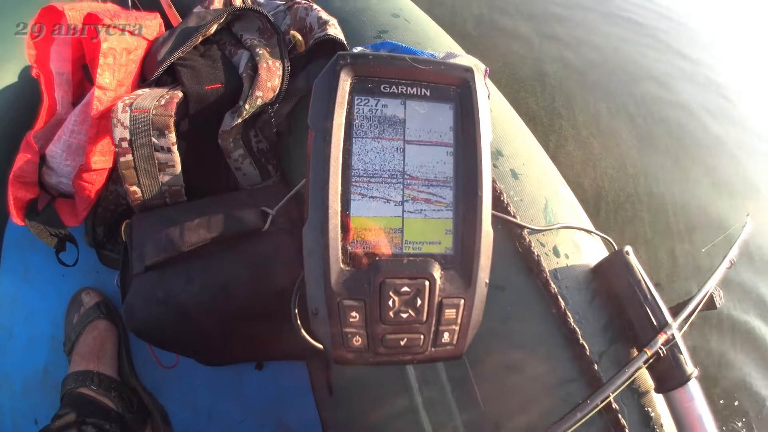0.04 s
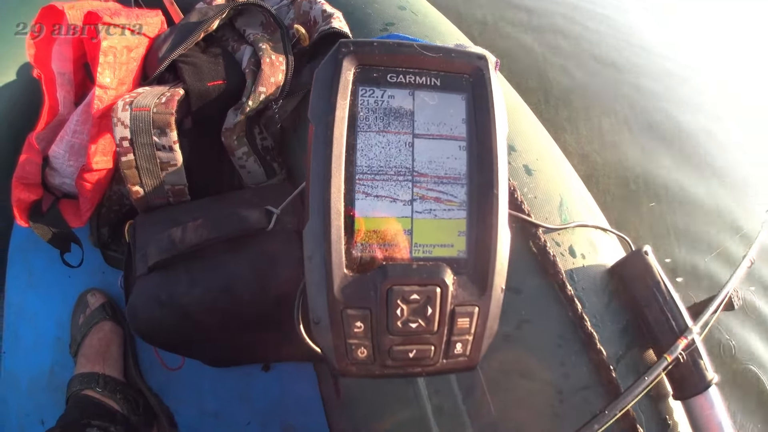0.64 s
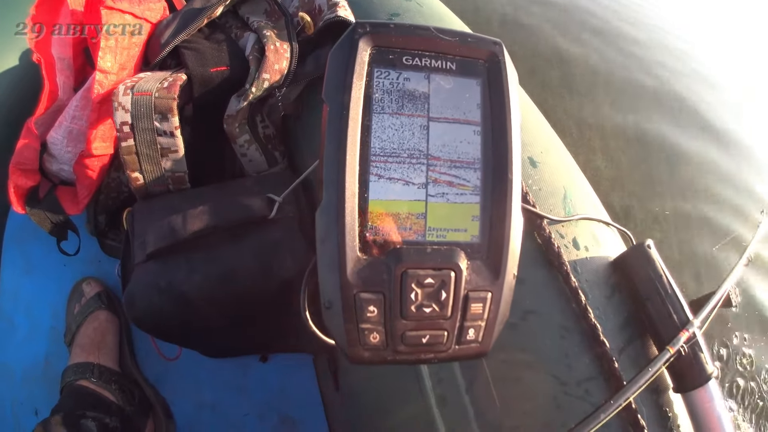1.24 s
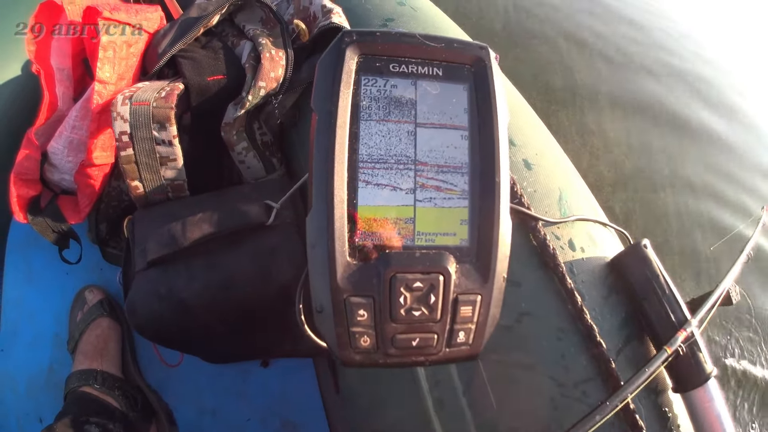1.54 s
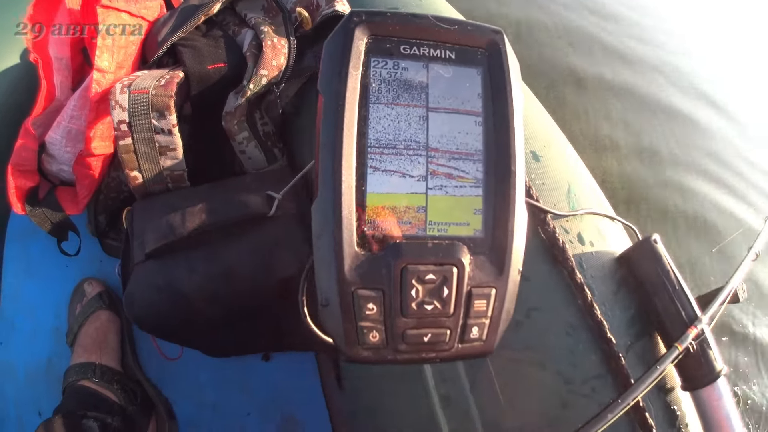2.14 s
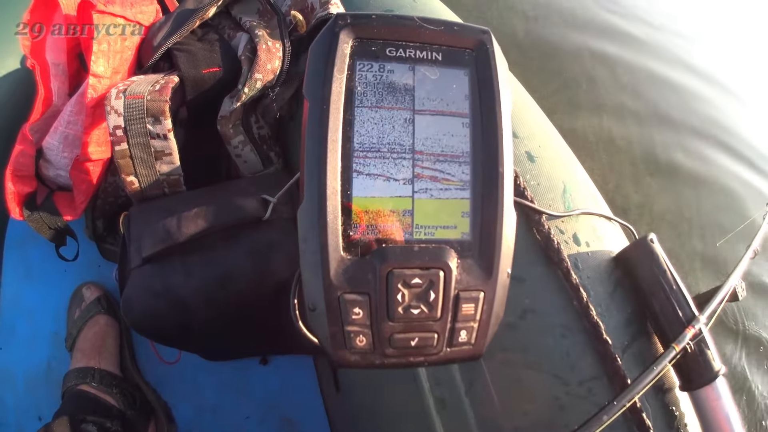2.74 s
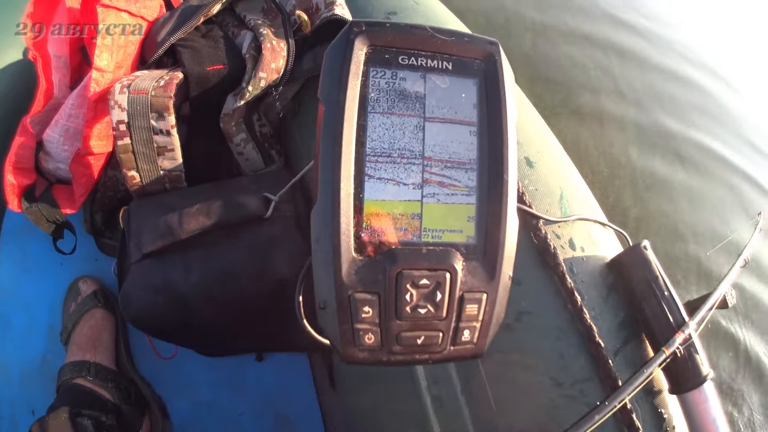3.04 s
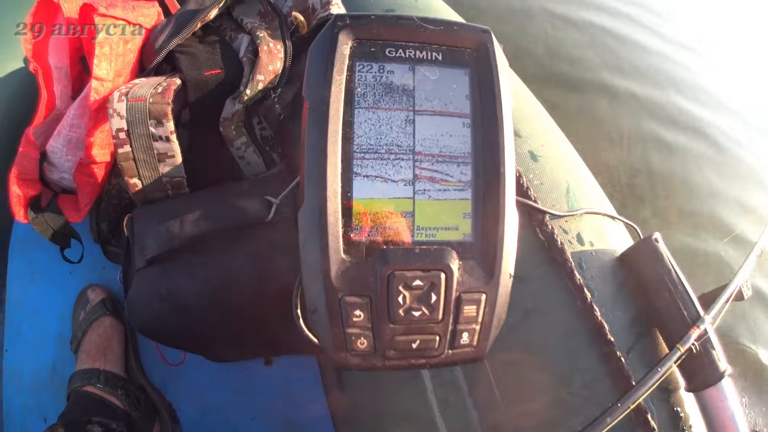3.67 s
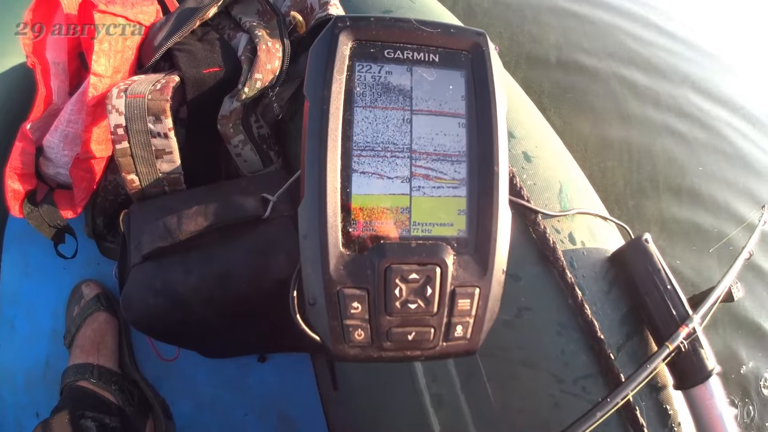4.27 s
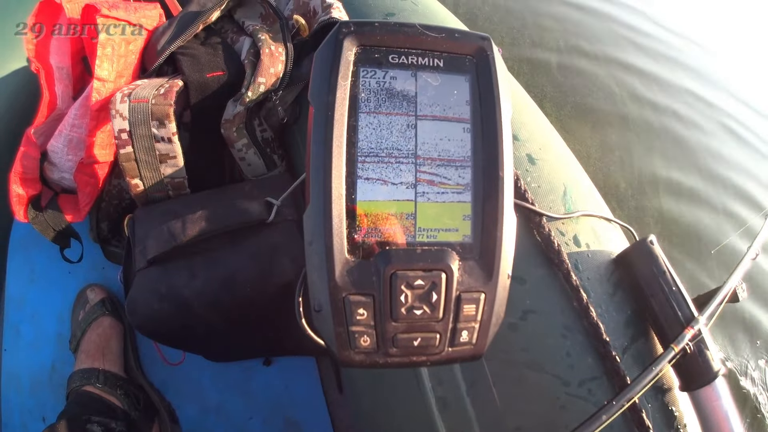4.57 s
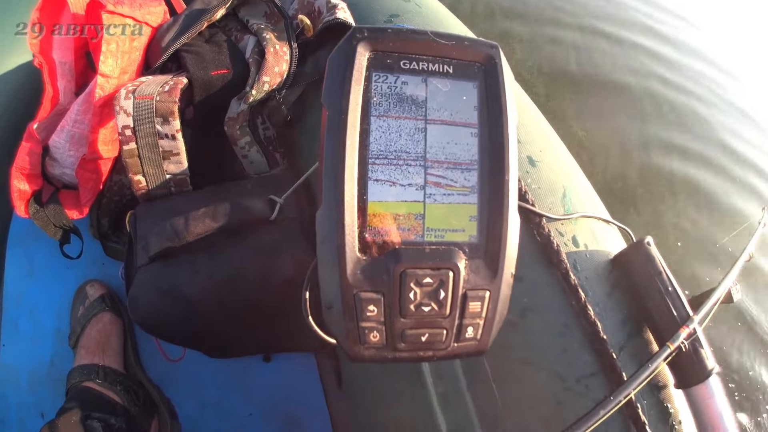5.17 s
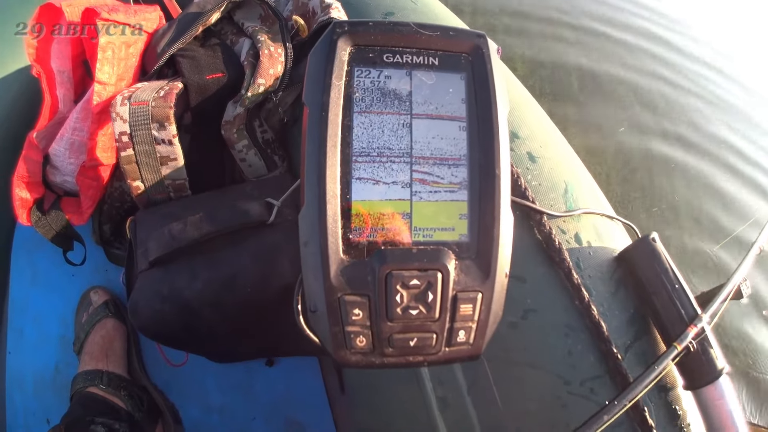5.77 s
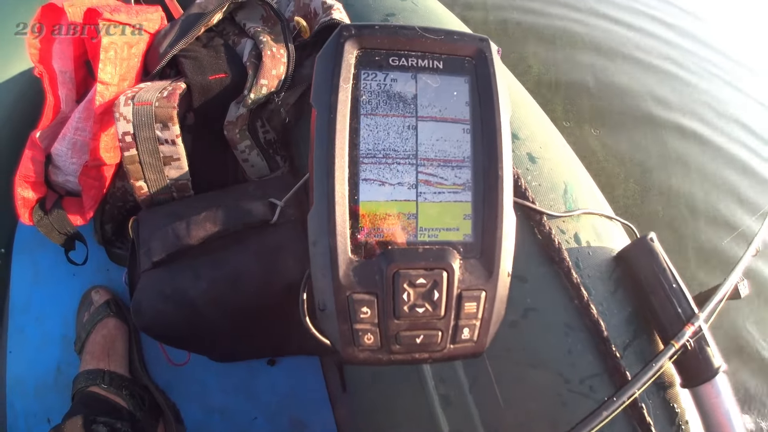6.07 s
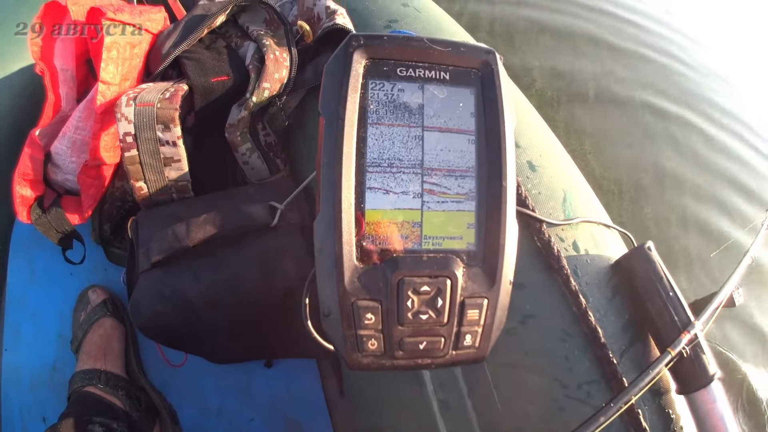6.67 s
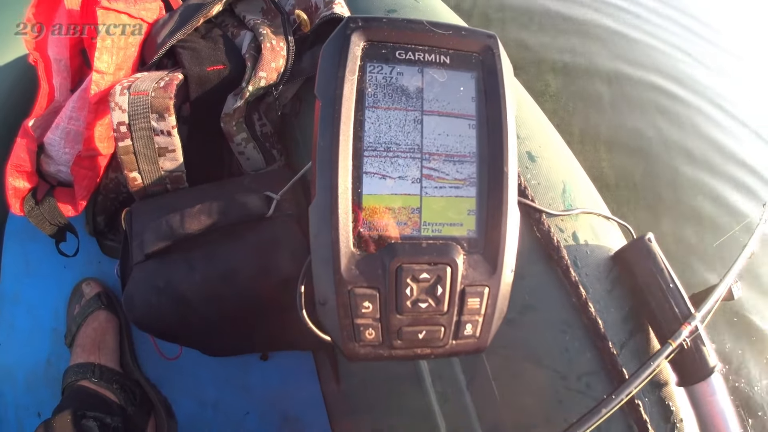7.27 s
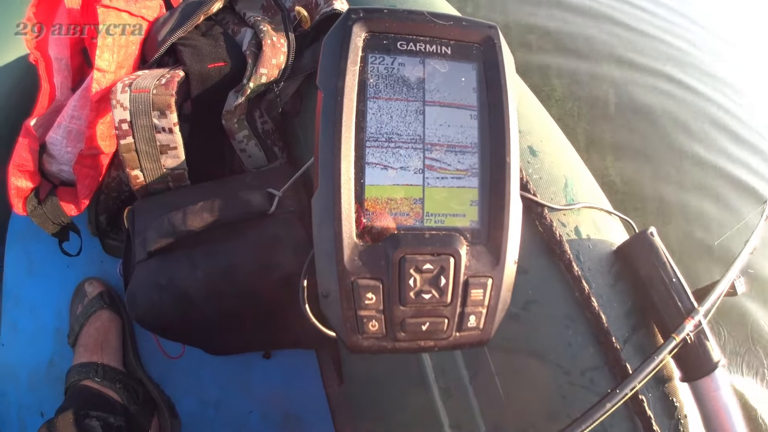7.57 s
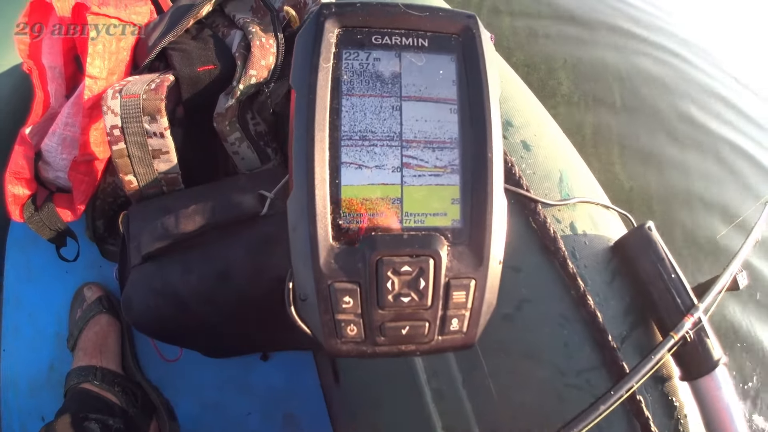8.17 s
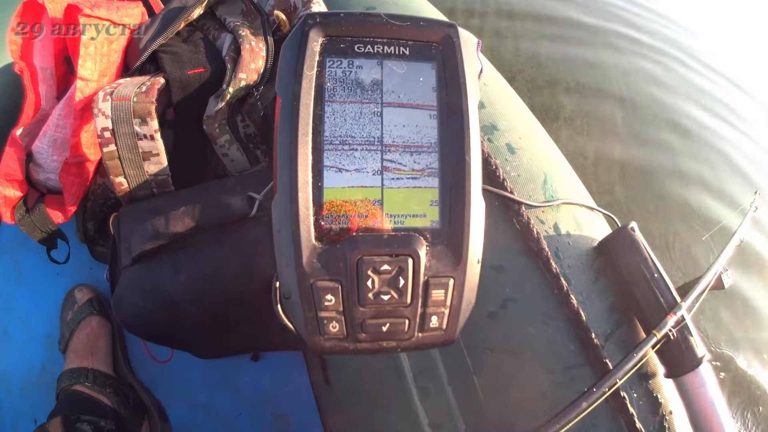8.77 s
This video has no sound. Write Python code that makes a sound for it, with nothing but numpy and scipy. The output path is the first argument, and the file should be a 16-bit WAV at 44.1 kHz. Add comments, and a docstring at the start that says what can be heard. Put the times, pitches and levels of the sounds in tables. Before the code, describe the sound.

A wooden catfish clonk strikes a river eight times, about once a second, worked from an inflatable boat. Each stroke is a quick slap and a loud, short, hollow gulp that rises in pitch. Spray then patters back with fizzing bubbles, plops and sharp drips, and small ripples lap softly at the hull. The water is close to the microphone and somewhat to the right, over a faint low rumble of open air.

```python
"""A wooden catfish clonk strikes a river about once a second, worked from an inflatable boat.
Each stroke slaps the water and drags a pocket of air down; the pocket opens with a loud rising gulp.
Spray and bubbles fall back, with plops and drips on top, and ripples lap at the hull.
Behind it, a far bird chirps over the low rumble of the open air."""
import sys
import numpy as np
from scipy import signal
from scipy.io import wavfile
from scipy.ndimage import uniform_filter1d

SR = 44100
rng = np.random.default_rng(int(sys.argv[2]) if len(sys.argv) > 2 else 0)


def store_wav(level_fs):
    """Save 16-bit WAV to argv[1]."""
    pcm = np.round(np.clip(np.atleast_2d(level_fs), -1, 1) * 32767)
    wavfile.write(sys.argv[1], SR, pcm.T.astype(np.int16))


N = 392931

# Clonk strokes: start_s, opens_after_s, gulp_end_hz, gulp_length_s, gulp_db, dip_tick_db,
# slap_db, slap_decay_s, crack_db, crack_hz
CLONK_STROKES = [(0.8784, 0.019, 399, 0.038, -3.7, -40, -14, 0.0055, -17, 860),
                 (1.908, 0.018, 451, 0.038, -2.7, -28, -10.5, 0.0057, -20, 1870),
                 (2.9321, 0.022, 324, 0.032, -4.2, -26, -15, 0.016, -15, 780),
                 (3.9572, 0.022, 368, 0.042, -5.8, -33, -11, 0.0074, -9, 2070),
                 (4.9725, 0.022, 389, 0.031, -3.8, -36, -17, 0.016, -15, 1000),
                 (6.0419, 0.02, 452, 0.019, -5.2, -33, -13, 0.0089, -19, 2720),
                 (7.103, 0.024, 398, 0.035, -4.3, -32.5, -16, 0.014, -14, 440),
                 (8.1269, 0.024, 433, 0.033, -4.2, -36.5, -14.5, 0.01, -15, 694)]
# The direct gulp and its echoes off hull and fisherman: delay_s, left_gain, right_gain
GULP_PATHS = [(0, .45, 1), (.0019, .10, -.33), (.0063, -.26, -.105), (.0113, .11, .15), (.0159, .074, .045)]
# Thrown water raining back: start_s, end_s, fade_s, fizz_db, bubbling_db, last_landing_db
SPRAY_SHOWERS = [(0.0, 0.208, 0.12, -1, 0, -10), (0.955, 1.28, 0.077, 1, 2, -3),
                 (2.023, 2.296, 0.12, -1, 1.5, 6.5), (3.072, 3.361, 0.031, -1.5, 1, -11),
                 (4.078, 4.41, 0.047, -4, -3, 3), (5.134, 5.369, 0.031, -0.5, 3, -6),
                 (6.19, 6.38, 0.13, -0.5, 0, -2), (7.222, 7.44, 0.11, 0, 2.5, -12),
                 (8.252, 8.477, 0.21, 0.5, 0, -21)]
# Large bubbles from falling water and ripples: start_s, level_db, pitch_hz, t60_s, splash_relative_db
WATER_PLOPS = [(0.049, -27.5, 1146, 0.042, -5), (1.045, -26, 865, 0.035, -14),
               (1.072, -24.5, 970, 0.031, -9), (1.17, -29, 361, 0.045, -6), (1.267, -22.5, 393, 0.03, -5),
               (1.59, -31, 445, 0.035, -6), (1.628, -30.5, 610, 0.035, -10), (2.139, -18, 963, 0.034, -14),
               (2.209, -18, 378, 0.032, -4.5), (2.297, -20, 580, 0.034, -18),
               (2.589, -27.5, 361, 0.027, -15), (2.78, -23.5, 425, 0.045, -19),
               (3.197, -15.5, 1160, 0.027, -13.5), (3.665, -32, 474, 0.045, -6),
               (4.174, -23.5, 1150, 0.03, -4), (4.212, -20.5, 1495, 0.022, -11),
               (4.259, -26.5, 1220, 0.063, -12), (4.294, -26.5, 403, 0.041, -26),
               (4.677, -29.5, 614, 0.031, -3.5), (4.926, -26.5, 361, 0.035, -16.5),
               (5.318, -27, 996, 0.035, -7), (5.342, -28, 1020, 0.052, -18),
               (5.729, -29, 580, 0.053, -12.5), (6.3, -26, 1270, 0.041, -7),
               (6.377, -21.5, 805, 0.043, -10), (7.292, -28, 1760, 0.045, -18),
               (7.333, -22.5, 528, 0.088, -4), (7.806, -27.5, 606, 0.036, -10),
               (8.36, -17.5, 690, 0.059, -14.5), (8.413, -29, 360, 0.045, 2), (8.473, -27, 387, 0.045, -21)]
# Single drops that stand out: start_s, level_db, pitch_hz
LOUD_DRIPS = [(0.1873, -27, 7000), (0.991, -25, 4940), (1.072, -24.5, 6310), (1.1124, -22.5, 3450),
              (1.275, -23.5, 6960), (1.8666, -22, 7380), (2.056, -26, 6270), (2.0993, -26, 7000),
              (2.3072, -19, 6310), (3.276, -20.5, 2840), (3.488, -23, 6930), (3.519, -32, 7400),
              (4.1026, -21.5, 4430), (4.226, -26, 5230), (4.2403, -26, 4100), (4.2607, -27, 6700),
              (4.6967, -30.5, 2700), (4.9552, -22, 4500), (5.1273, -26.5, 3560), (5.1951, -19.5, 3160),
              (5.2757, -23, 3900), (6.189, -23, 2640), (6.5468, -30.5, 4760), (7.233, -27.5, 7000),
              (7.3147, -25, 3230), (8.112, -20, 4550), (8.2924, -28, 4820), (8.3123, -25, 5740)]
# The far bird: centre_s, top_pitch_hz, level_db
BIRD_CHIRPS = [(4.829, 4230, -62), (6.902, 4350, -59), (7.024, 4160, -61)]
# Tone of the slap, droplet fizz, small bubbles, foam and open air: frequency_hz, level_db
SLAP_EQ = [(150, -8.5), (350, -3.5), (600, -1), (900, 0), (1500, -8.5), (2100, -7.5), (2800, -6.5),
           (3700, -12), (5000, -11), (7800, -15.5)]
FIZZ_EQ = [(600, -14), (1500, -11.5), (2200, -7), (4000, -2), (5000, -1.5), (7500, -1), (11000, -0.5)]
BUBBLING_EQ = [(200, -10.5), (400, -2), (700, 0), (1200, 2.5), (1700, -0.5), (2600, -2.5), (5000, -58.5)]
FOAM_EQ = [(200, -8.5), (400, -2), (650, 1.5), (1100, 1.5), (1700, -7.5), (2600, -12.5), (5000, -54)]
AIR_EQ = [(12, -21), (22, -31), (45, -1), (85, 2), (125, -6), (196, -7), (245, -10.5), (300, -19.5),
          (420, -23.5), (650, -26.5), (1000, -34.5), (2000, -37.5), (4000, -44), (8000, -45.5),
          (11000, -35.5)]
# Stereo image of the open air: frequency_hz, left_right_correlation
AIR_CORRELATION = [(60, 1), (200, 1), (600, 0.61), (2000, 0.067), (8000, 0.72)]
# Microphone response: frequency_hz, gain_db
MICROPHONE_EQ = [(20, -0.5), (7800, 3), (8400, -3.5), (9100, -12.5), (11000, -15.5)]

THUMP_HZ, THUMP_DB = 77.8, -8.5
GULP_START_HZ, GULP_GLIDE_S, OPENING_S = 162, .0225, .0003
SKIM_RISE_S = .021  # the blade cuts the surface just before the slap
BURST_AFTER_S, BURST_RISE_S, BURST_FADE_S = .057, .031, .039  # the open pocket collapses into foam
LAP_AFTER_S, LAP_RISE_S, LAP_FADE_S = .725, .03, .05  # each stroke's ripple reaches the hull
# Balance of the water's phases: calm_db, skim_db, burst_db, shower_db, lap_db
FIZZ_DB = (-60.5, -33.5, -33, -39.5, -57)
BUBBLING_DB = (-61, -42, -30, -41.5, -50)
DIP_LEAD_S, DIP_HZ = .106, 7270  # the clonk touches the water ahead of each stroke
STRAYS_PER_S, STRAY_DB, STRAY_HZ = 4, (-38, -42), (2540, 7270)


def gulps():
    """The air pocket thumps while it is dragged down, then opens and rings higher as it shrinks."""
    pocket, shove = np.zeros((2, N))
    t = np.arange(SR // 5) / SR
    push = np.sin(2 * np.pi * np.linspace(0, 1, SR // 30)) * signal.windows.hann(SR // 30)
    for start, opens, end_hz, length, gulp_db, *_ in CLONK_STROKES:
        age = np.maximum(t - opens, 0)
        opened = .5 + .5 * np.tanh((t - opens) / OPENING_S)  # crossfade from thump to gulp
        gulp_hz = end_hz + (GULP_START_HZ - end_hz) * np.exp(-age / GULP_GLIDE_S)
        gulp_level = gain_of(gulp_db) * np.exp(-(age / length) ** 2.7)
        hz = (1 - opened) * THUMP_HZ + opened * gulp_hz
        level = (1 - opened) * gain_of(THUMP_DB) + opened * gulp_level
        add(pocket, start, -level * np.sin(2 * np.pi * np.cumsum(hz) / SR))
        # the entering head shoves the water aside, and it swings back
        add(shove, start - .3 * len(push) / SR, gain_of(-18) * push)
    stereo = np.array([shove, shove])
    for delay, left, right in GULP_PATHS:
        add(stereo[0], delay, left * pocket)
        add(stereo[1], delay, right * pocket)
    return stereo + gain_of(-17) * boat_reflections(pocket, t60=.17)


def slaps():
    """The clonk's head tears the surface: a crackle that builds, cracks and dies fast."""
    level, cracks = np.zeros((2, N))
    t = np.arange(-SR // 20, SR // 10) / SR
    peak_after_s, build_s, skim_s = .0025, .0022, .01
    attack = np.maximum(np.exp(-abs(t) / build_s), gain_of(-11) * np.exp(-abs(t) / skim_s))
    for start, *_, slap_db, decay, crack_db, crack_hz in CLONK_STROKES:
        peak = start + peak_after_s
        envelope = np.where(t < 0, attack, np.exp(-abs(t) / decay))
        add(level, peak + t[0], gain_of(slap_db) * envelope)
        # air pinched under the head rings briefly
        add(cracks, peak, gain_of(crack_db) * bubble(crack_hz, t60=.011, rise=.05, attack_cycles=.8))
    crackle = rng.standard_normal(N) * gain_of(4 * flutter(samples=20))
    return level * unit_rms(equalise(crackle, SLAP_EQ)) + cracks


def spray():
    """Droplets patter back on the river in clumps, churn up foam and trap small bubbles."""
    fizz_level, foam_level, bubble_level = spray_envelopes()
    clumps = gain_of(2 * flutter(samples=1200))
    mist, churn = rng.standard_normal((2, N))
    patter = unit_rms(mist * gain_of(4.2 * flutter(samples=130)))
    droplets = bubble_swarm(1500, 10100, per_s=1200, ring_cycles=36)
    trapped = bubble_swarm(420, 2604, per_s=260, ring_cycles=27)
    fizz = fizz_level * unit_rms(equalise(droplets + gain_of(-1) * patter, FIZZ_EQ))
    foam = foam_level * unit_rms(equalise(churn, FOAM_EQ))
    bubbles = bubble_level * unit_rms(equalise(trapped, BUBBLING_EQ))
    return clumps * (fizz + gain_of(-4) * foam + gain_of(-1.5) * bubbles)


def spray_envelopes():
    """Fizz, foam and bubble levels: calm water, skim, burst, shower and lap add up in power."""
    skim = burst = shower = lap = 0
    for start, *_ in CLONK_STROKES:
        collapse, arrival = start + BURST_AFTER_S, start + LAP_AFTER_S
        skim += swell(start, start, SKIM_RISE_S, BURST_RISE_S) ** 2
        burst += swell(collapse, collapse, BURST_RISE_S, BURST_FADE_S) ** 2
        lap += swell(arrival, arrival, LAP_RISE_S, LAP_FADE_S) ** 2
    for start, end, fade, fizz_db, bubbling_db, landing_db in SPRAY_SHOWERS:
        rain = gain_of([[fizz_db], [bubbling_db]]) * swell(start, end, rise_s=.055, fade_s=fade)
        last_sheet = gain_of(landing_db) * swell(end, end, rise_s=.026, fade_s=.026)
        shower += rain ** 2 + last_sheet ** 2
    powers = gain_of([FIZZ_DB, BUBBLING_DB]).T[:, :, None] ** 2
    calm_power, skim_power, burst_power, shower_power, lap_power = powers
    settling = calm_power + shower_power * shower + lap_power * lap
    fizz, foam = np.sqrt(settling + skim_power * skim + burst_power * burst)
    return fizz, foam, np.sqrt(settling[1])


def plops():
    """A lump of water splashes, traps one large bubble and sheds four smaller ones."""
    out, t = np.zeros(N), np.arange(SR // 20) / SR
    splash_decay_s, shed_within_s = .0057, .02
    for start, db, hz, t60, splash_db in WATER_PLOPS:
        add(out, start, gain_of(db + .5) * bubble(hz, t60, rise=.074, attack_cycles=.27))
        splash = unit_rms(equalise(rng.standard_normal(len(t)), SLAP_EQ)) * np.exp(-t / splash_decay_s)
        add(out, start, gain_of(db + splash_db) * splash)
        for lateness, pitch in rng.random((4, 2)):
            small_hz = hz * (1.12 + 2.53 * pitch ** 2)
            small = bubble(small_hz, t60=13 / small_hz, rise=.08, attack_cycles=.4)
            add(out, start + shed_within_s * lateness, gain_of(db - 8) * small)
    return out


def drips():
    """Loud drops, the tick of the clonk dipping in, and faint strays at random times."""
    out = np.zeros(N)
    for start, db, hz in LOUD_DRIPS:
        add(out, start, drop(db, hz, decay_s=.0016))
    for start, _, _, _, _, dip_db, *_ in CLONK_STROKES:
        add(out, start - DIP_LEAD_S, drop(dip_db, DIP_HZ * rng.uniform(.82, 1.1), decay_s=.0038))
    for when, faintness, pitch in rng.random((int(STRAYS_PER_S * N / SR), 3)):
        db = np.interp(faintness, (0, 1), STRAY_DB)
        hz = np.interp(pitch, (0, 1), STRAY_HZ)
        add(out, when * N / SR, drop(db, hz, decay_s=.0018))
    return out


def drop(db, hz, decay_s):
    """A tick on the surface and the ping of a tiny bubble."""
    t = np.arange(SR // 40) / SR
    out = unit_rms(equalise(rng.standard_normal(len(t)), FIZZ_EQ)) * np.exp(-t / decay_s)
    add(out, 0, gain_of(-5) * bubble(hz, t60=.021, rise=.05, attack_cycles=.51))
    return gain_of(db) * out


def bubble(hz, t60, rise, attack_cycles):
    """A ringing bubble: it speaks within a cycle or so and bends up as it nears the surface."""
    t = np.arange(int(t60 * SR) + 8) / SR
    cycles = hz * t * (1 + rise * t / t60)
    attack = 1 - np.exp(-cycles / attack_cycles)
    ring = np.sin(2 * np.pi * cycles) * attack * np.exp(-np.log(1000) * t / t60)
    return ring / abs(ring).max()


def bubble_swarm(low_hz, high_hz, per_s, ring_cycles, spread_db=4.5, pitches=150):
    """Small bubbles across a pitch range ring at random times, most soft and a few loud."""
    out = np.zeros(N)
    per_pitch = int(per_s * N / SR / pitches)
    for hz in np.geomspace(low_hz, high_hz, pitches):
        ring = bubble(hz, t60=ring_cycles / hz, rise=.1, attack_cycles=.4)
        when, faintness = rng.random((400, 2))[:per_pitch].T
        gains = gain_of(spread_db * np.minimum(-np.log(faintness), 4))
        for start, gain in zip(when * N / SR, gains):
            add(out, start, gain * ring)
    return unit_rms(out)


def boat_reflections(x, t60):
    """A short tail of sparse reflections off the boat and its gear, different on each side."""
    t = np.arange(SR // 4) / SR
    taps = rng.standard_normal((2, len(t))) * (rng.random((2, len(t))) < .1)
    taps *= np.exp(-np.log(1000) * t / t60)
    taps /= np.linalg.norm(taps, axis=1, keepdims=True)
    return signal.oaconvolve(x[None], taps, axes=1)[:, :N]


def bird():
    """Thin arched whistles that fall away at the end."""
    out, t = np.zeros(N), np.arange(-.028, .034, 1 / SR)
    arch_s = np.where(t < 0, .075, .043)
    envelope = signal.windows.tukey(len(t), .5)
    for centre, top_hz, db in BIRD_CHIRPS:
        hz = top_hz / (1 + (t / arch_s) ** 2)
        add(out, centre + t[0], gain_of(db) * envelope * np.sin(2 * np.pi * np.cumsum(hz) / SR))
    return out


def open_air():
    """A bed of low rumble and faint hiss over the river, drifting in patches."""
    frames, hz = N // 512 + 5, np.fft.rfftfreq(2048, 1 / SR)
    left_re, left_im, side_re, side_im, patches = rng.standard_normal((frames, len(hz), 5)).T
    patches = uniform_filter1d(patches, size=12, axis=0)  # across pitch
    patches = unit_rms(uniform_filter1d(patches, size=8, axis=1))  # across time
    correlation = curve_at(AIR_CORRELATION, hz)[:, None]
    left = left_re + 1j * left_im
    right = correlation * left + np.sqrt(1 - correlation ** 2) * (side_re + 1j * side_im)
    spectra = np.array([left, right]) * gain_of(curve_at(AIR_EQ, hz)[:, None] + 2.6 * patches)
    _, bed = signal.istft(spectra, nperseg=2048, noverlap=1536)
    return gain_of(-38) * unit_rms(bed[:, :N])


def swell(start, end, rise_s, fade_s):
    """Exponential attack, hold from start to end, release."""
    t = np.arange(N) / SR
    log_level = np.minimum((t - start) / rise_s, 0) + np.minimum((end - t) / fade_s, 0)
    return np.exp(np.maximum(log_level, -20))


def flutter(samples):
    """Random modulation at rms 1, smoothed over so many samples."""
    return unit_rms(uniform_filter1d(rng.standard_normal(N), size=samples))


def equalise(x, curve):
    """Minimum-phase EQ that follows a curve in dB."""
    hz = abs(np.fft.fftfreq(2048, 1 / SR))
    log_gain = np.log(gain_of(curve_at(curve, hz)))
    taps = np.fft.ifft(np.exp(np.conj(signal.hilbert(log_gain)))).real
    return signal.oaconvolve(x, taps)[:len(x)]


def curve_at(curve, hz):
    """Reads a curve on a log-frequency axis."""
    points_hz, values = np.transpose(curve)
    return np.interp(np.log(hz + 1), np.log(points_hz + 1), values)


def gain_of(db):
    """Decibels to amplitude."""
    return 10 ** (np.asarray(db) / 20)


def unit_rms(x):
    """Scales to rms 1."""
    return x / np.sqrt(np.mean(x ** 2) + 1e-20)


def add(mix, start_s, sound):
    """Mixes a sound in at start_s."""
    part = mix[max(round(start_s * SR), 0):][:len(sound)]
    part += sound[:len(part)]


def scene():
    """Gulps up front, splashes jittering around a spot to the right, bird and air behind."""
    water = slaps() + spray() + plops() + drips()
    pan = flutter(samples=250)
    left = gain_of(-6.8 + 2.4 * pan) * water
    right = gain_of(-.5 - .6 * pan) * np.roll(water, 1)
    reflected = gain_of([[-16], [-12]]) * boat_reflections(water, t60=.035)
    return gulps() + np.array([left, right]) + reflected + bird() + open_air()


def record(dry):
    """The microphone loses the top of the treble and rounds the loudest peaks."""
    ceiling, cutoff_hz = .98, 11200
    dull = np.array([equalise(side, MICROPHONE_EQ) for side in dry])
    rounded = dull / (1 + (dull / ceiling) ** 12) ** (1 / 12)
    lowpass = signal.firwin(401, cutoff_hz, window=("kaiser", 8), fs=SR)
    return signal.oaconvolve(rounded, lowpass[None], "same")


dry = scene()
out = record(dry)
store_wav(out)
```